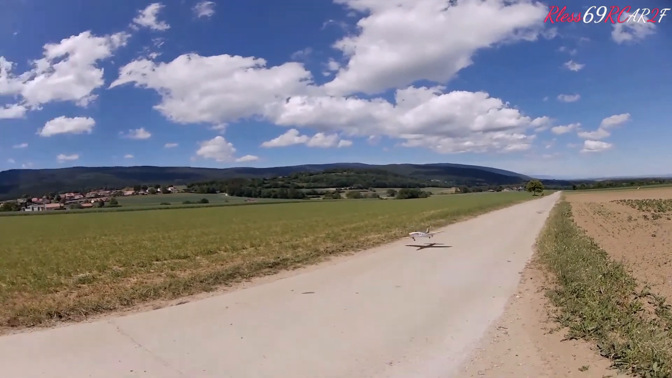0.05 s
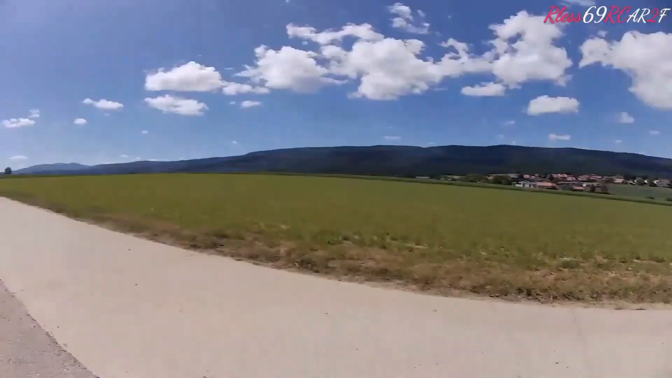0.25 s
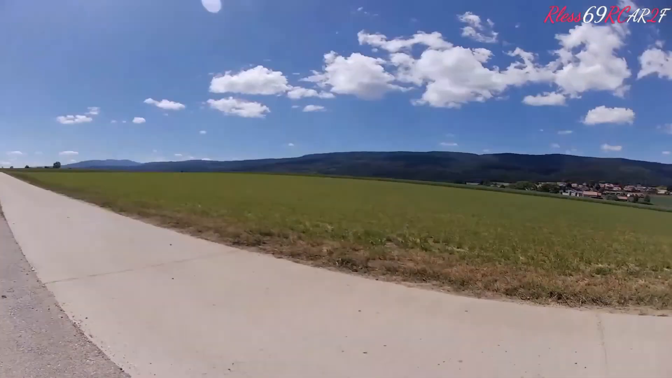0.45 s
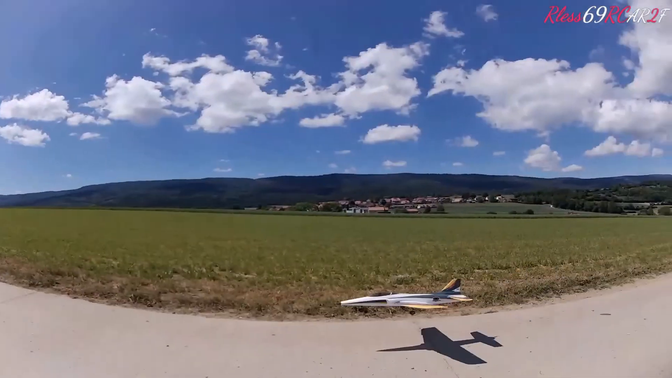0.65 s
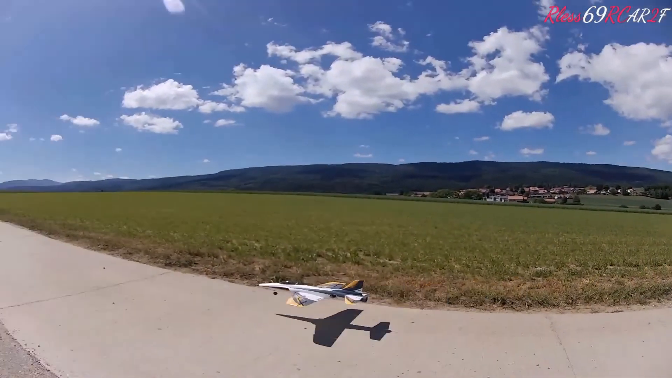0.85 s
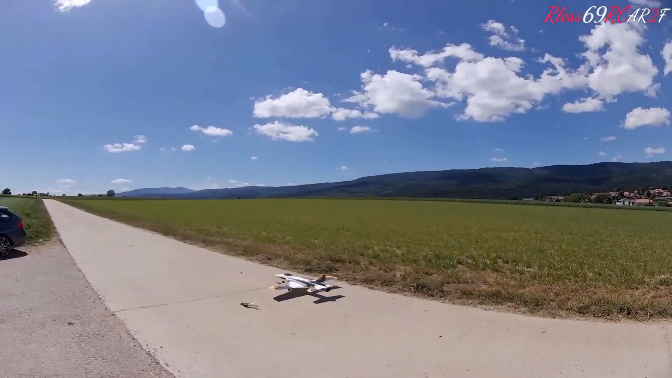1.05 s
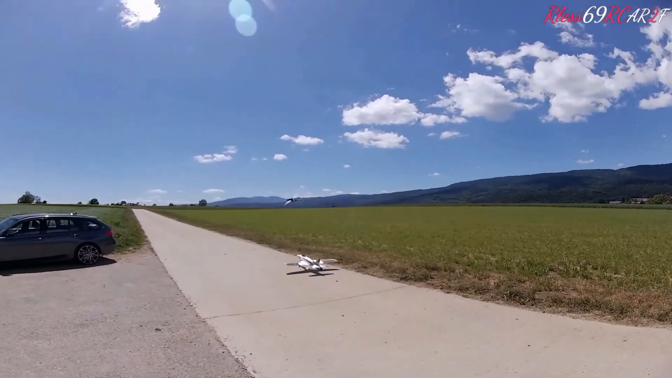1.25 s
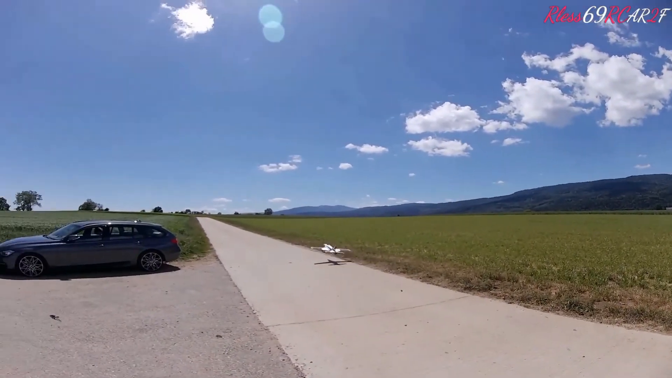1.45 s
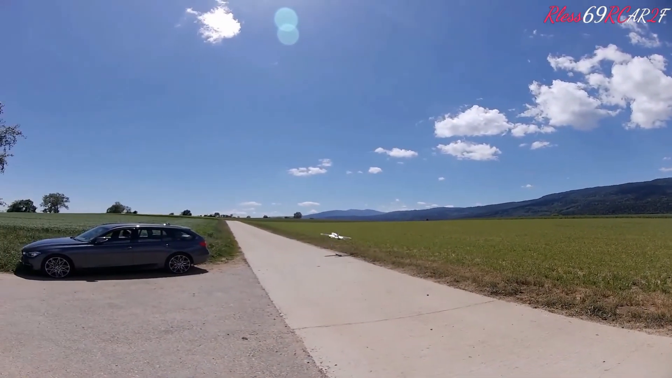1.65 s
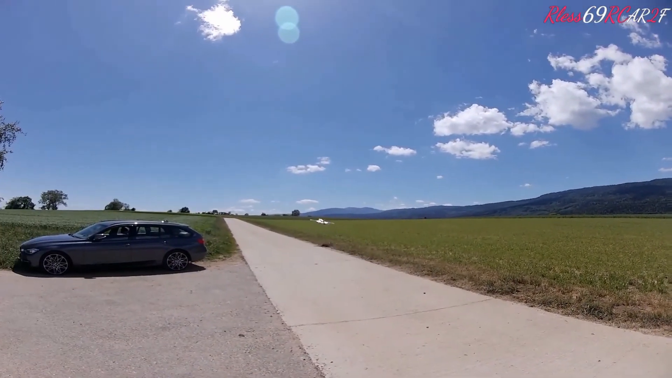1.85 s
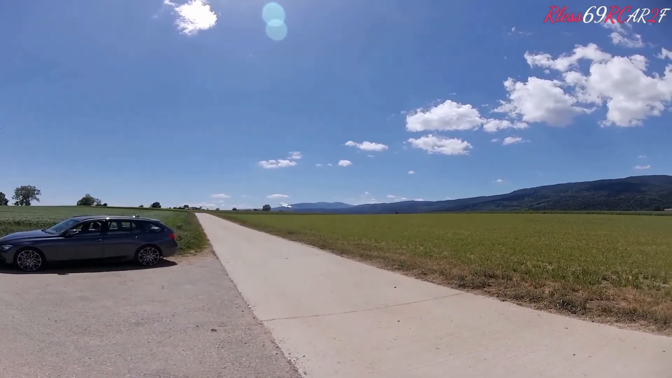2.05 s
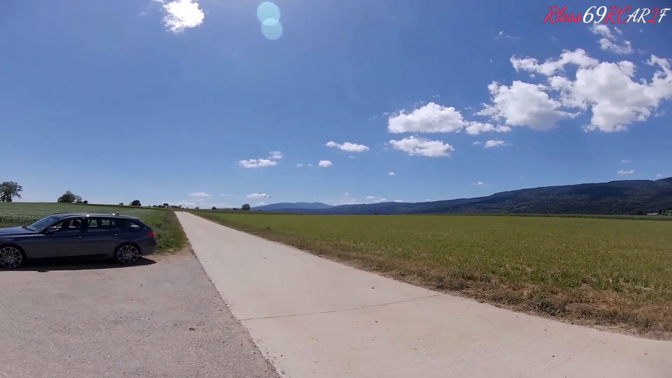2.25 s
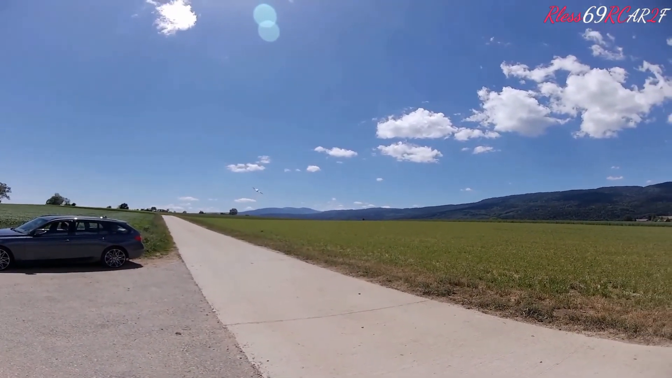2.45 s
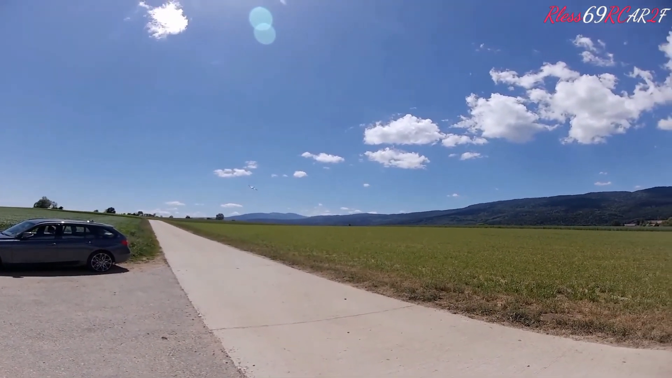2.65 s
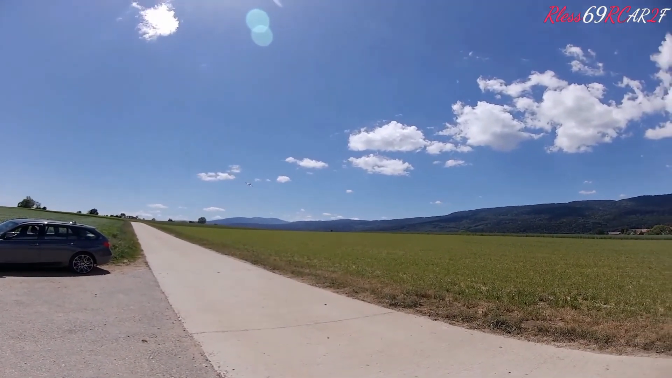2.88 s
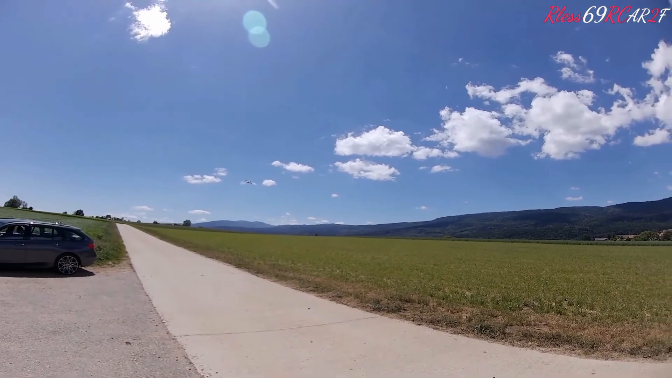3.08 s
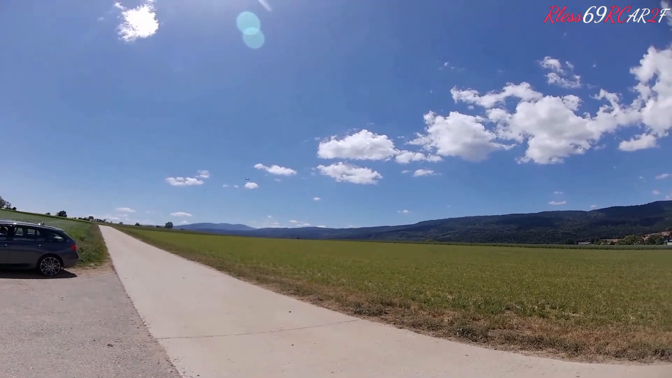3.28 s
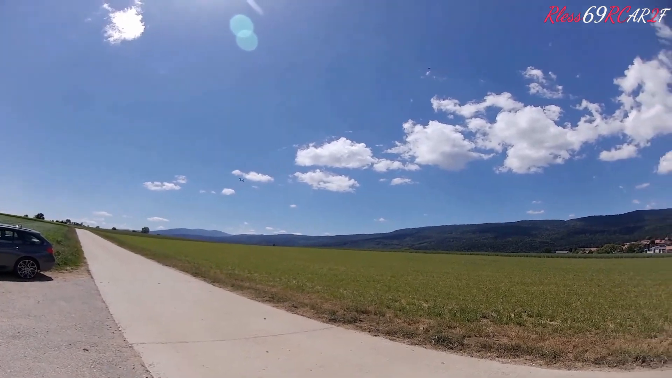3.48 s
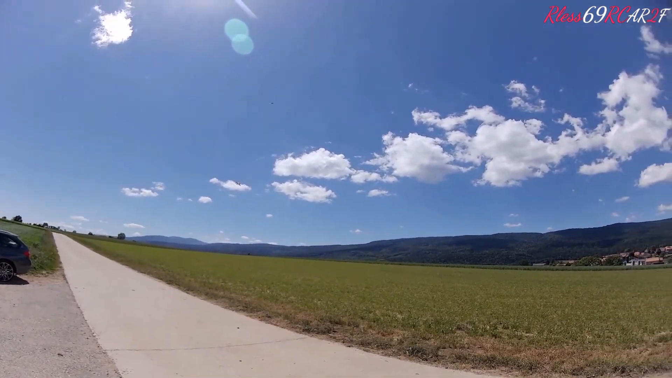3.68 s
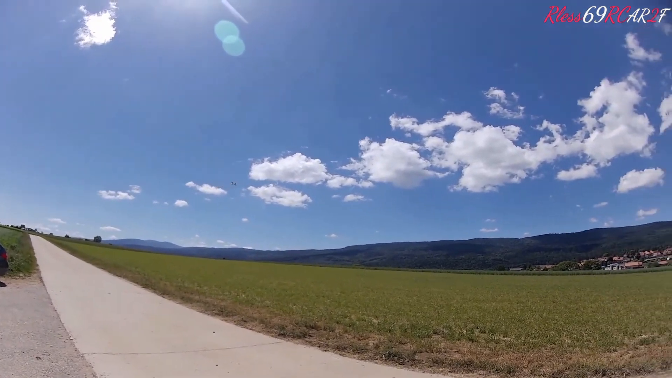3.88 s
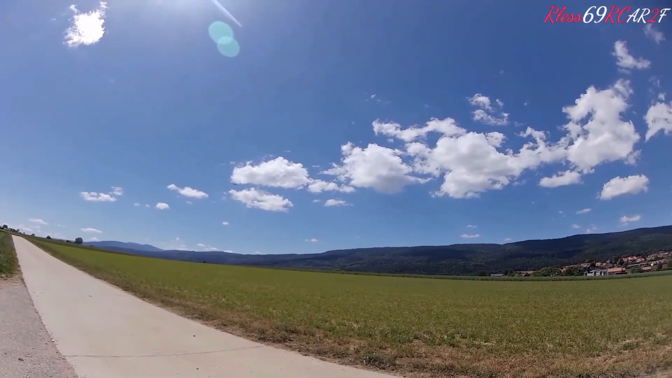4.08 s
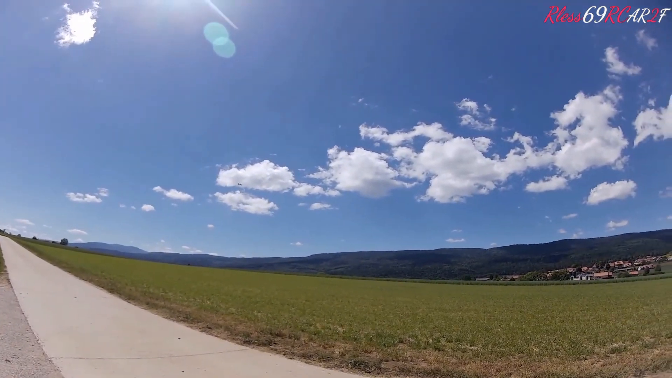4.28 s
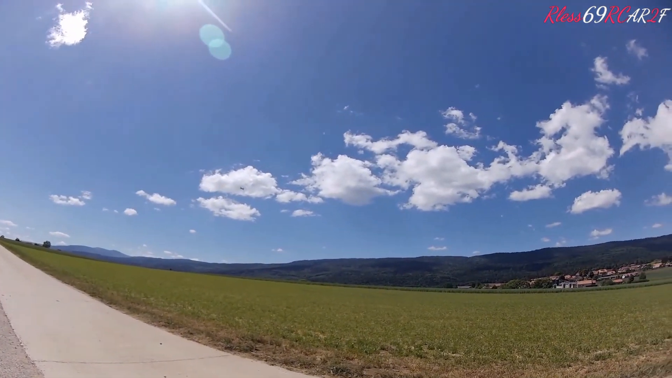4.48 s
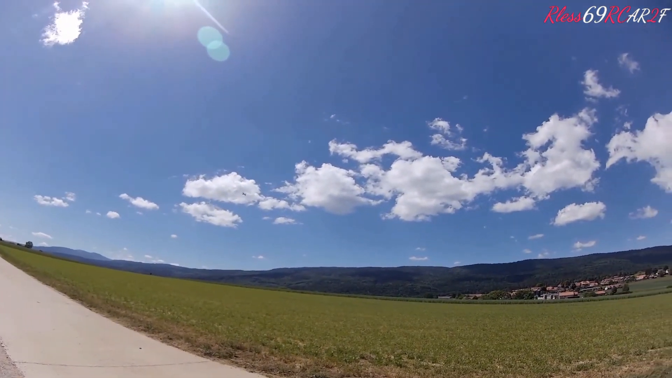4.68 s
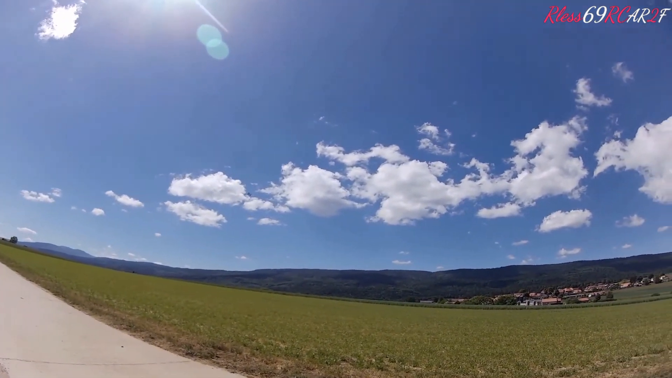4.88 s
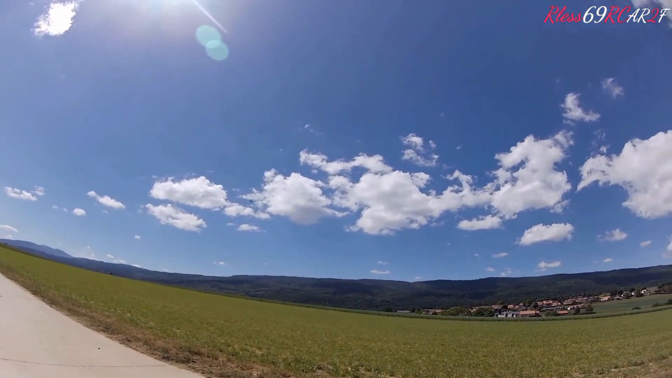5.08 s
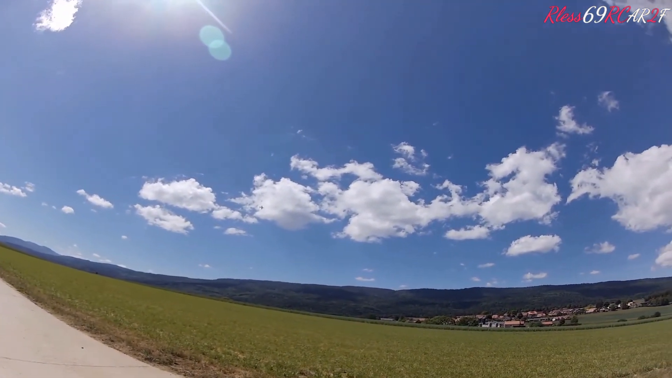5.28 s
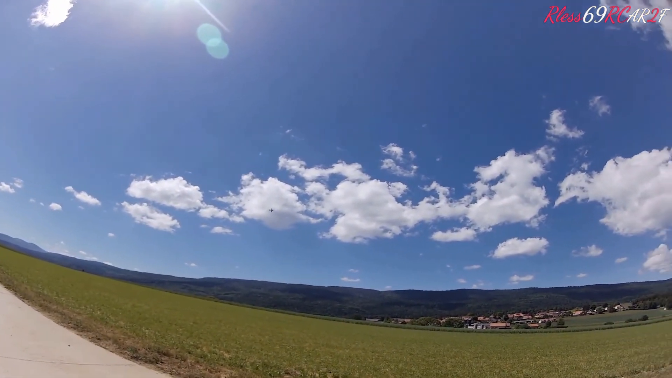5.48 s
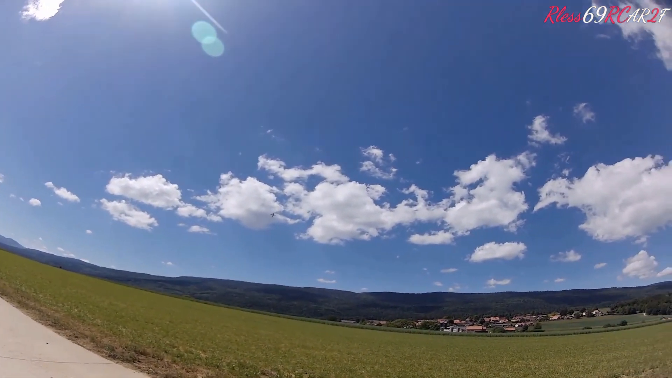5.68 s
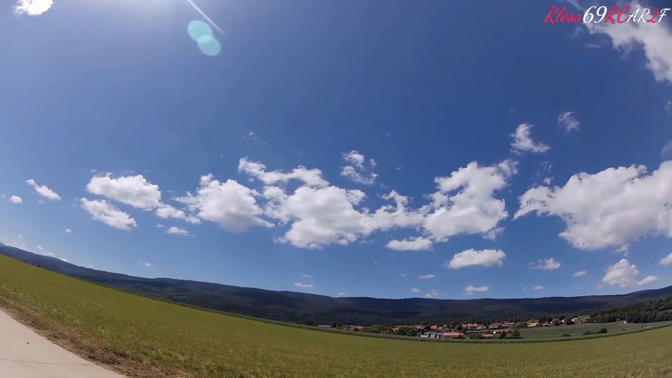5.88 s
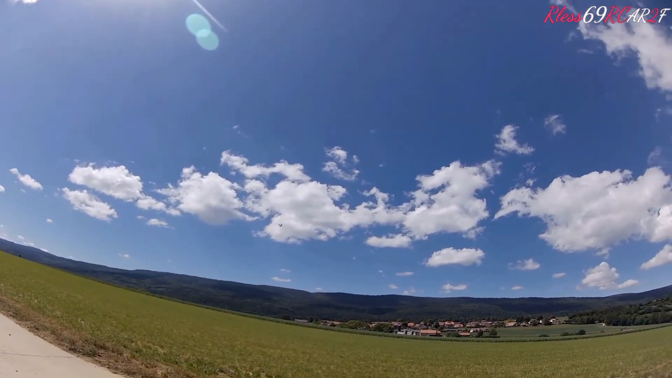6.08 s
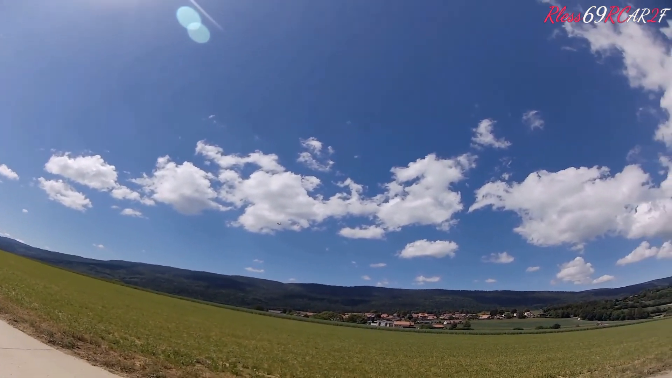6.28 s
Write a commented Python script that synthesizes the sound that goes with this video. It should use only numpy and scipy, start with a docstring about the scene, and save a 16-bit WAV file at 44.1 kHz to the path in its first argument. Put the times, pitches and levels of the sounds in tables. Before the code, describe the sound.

From 0 to 0.65 s the close stereo microphone picks up low wind buffets, grainy cloth rubbing, a sharp click at 0.2, a hard dull knock at 0.56 and another click at 0.63. From about 0.65 an electric model jet spools up steeply, fuzzy whine gliding to around 7 kHz by 1.1 s, with a higher octave, a low rotor hum and a strong broadband exhaust hiss as it passes close. After 1.4 s it recedes fast; the rush becomes hollow and its comb-like colour sweeps downward until about 3 s. A whine glints near 3 s, then the throttle eases from 3.2 to 4.4, pitch sagging and the rush thinning. It spools up again around 4.8 to 5, faint and twinkling, remaining distant to 6.3 s. Lumpy gusts rumble at 1.7, 3.7 and 4.3, with smaller puffs and soft knocks near 4.9, 5.75 and 6.1, over very quiet open-field noise.

```python
"""Model jet taking off past a body-worn camera

An electric ducted-fan jet spools up on a concrete strip, rolls past, lifts off and climbs away, easing
the throttle for a while. Its ten-blade fan whines as fuzzy tones locked to the shaft, over the exhaust,
which is shaped noise; the bounce off the ground sweeps a comb through it as the jet climbs. Gusts of low
noise buffet the camera, which rustles, clicks and knocks as it turns to follow, in a quiet open field.
"""
import sys
import numpy as np
from scipy import signal
from scipy.fft import rfft, irfft
from scipy.io import wavfile
from scipy.ndimage import uniform_filter1d

SR = 44100
rng = np.random.default_rng(int(sys.argv[2]) if len(sys.argv) > 2 else 0)


def file_out(sig):
    """Save sig as 16-bit WAV at sys.argv[1]."""
    # one column per channel
    cols = np.atleast_2d(sig).T
    # limit, then scale
    lim = np.clip(cols, -1, 1)
    pcm = np.round(lim * 32767).astype(np.int16)
    wavfile.write(sys.argv[1], SR, pcm)


N = 279577
TIME = np.arange(N) / SR
# the grid of short-time noise spectra: frame times down, frequencies across
FRAME_S = np.arange(N // 256 + 5)[:, None] * 256 / SR
BIN_HZ = np.fft.rfftfreq(1024, 1 / SR)

# Fan speed as heard from the camera. Each row: time in seconds, shaft turns a second.
SHAFT_SPEED = [(0.6, 230.8), (0.72, 354.9), (0.9, 603.8), (0.98, 663.6), (1.08, 704.9), (1.52, 689.0),
               (3.03, 671.5), (3.2, 641), (3.35, 638.5), (3.48, 574.7), (3.62, 546.2), (3.86, 524.2),
               (4.4, 527.1), (4.48, 562.2), (4.72, 563.9), (4.9, 660.6), (5.0, 680.3), (5.8, 687.8),
               (6.34, 701.6)]
# Relative spectrum of the exhaust rush. Each row: frequency in Hz, density in dB per Hz.
RUSH_SPECTRUM = [(60, -33), (350, -12), (700, -7.5), (1200, 4), (1850, -12), (2650, -10.5), (2950, -14.5),
                 (4100, 1.5), (5000, -10.5), (6600, -10), (8900, -16), (9700, -13), (11200, -14),
                 (14500, -19.5)]
# Phase between the two microphone ports. Each row: frequency in Hz, radians by which left leads.
PORT_LEAD = [(100, 0), (3000, 0.14), (8000, -0.45), (14000, -0.75)]


def amp(db):
    """Amplitude factor for a level in dB."""
    return 10 ** (np.asarray(db) / 20)


def evened(x):
    """The signal scaled to rms 1."""
    return x / np.sqrt(np.mean(x ** 2) + 1e-20)


def read(points, hz):
    """A spectrum, joined on a log-frequency axis."""
    f, value = np.transpose(points)
    return np.interp(np.log(hz + 1), np.log(f + 1), value)


def follow(rows, t):
    """The columns of a control table at times t."""
    s, *columns = np.transpose(rows)
    return [np.interp(t, s, c) for c in columns]


def add(mix, s, sound):
    """Lay a sound into the mix from time s, cut at the end."""
    part = mix[max(round(s * SR), 0):][:len(sound)]
    part += sound[:len(part)]


def wander(rate_hz):
    """Smooth chance of rms 1, with changes up to about rate_hz."""
    hz = np.fft.rfftfreq(N, 1 / SR)
    spectrum = rfft(rng.standard_normal(N)) / (1 + (hz / rate_hz) ** 2)
    return evened(irfft(spectrum, N))


def band_rms(gain, lo_hz, hi_hz):
    """The rms that noise of this spectrum has within one band."""
    inside = (BIN_HZ > lo_hz) & (BIN_HZ < hi_hz)
    return np.sqrt(np.mean(gain ** 2 * inside, -1, keepdims=True))


def noise(gain, patchy_db):
    """Noise at both ports with the given short-time spectrum, broken into drifting patches."""
    # Likeness of the two microphone ports. Each row: frequency in Hz, likeness from 0 to 1.
    likeness = [(120, .9993), (300, .994), (1400, .98), (3000, .94), (7000, .86), (14000, .6)]
    a, b, c, d, patches = rng.standard_normal((5, len(FRAME_S), len(BIN_HZ)))
    patches = uniform_filter1d(patches, size=8, axis=0)
    patches = evened(uniform_filter1d(patches, size=12, axis=1))
    same = np.clip(read(likeness, BIN_HZ), 0, 1)
    mid = np.sqrt((1 + same) / 2) * (a + 1j * b)
    side = np.sqrt((1 - same) / 2) * (c + 1j * d)
    left = mid + side
    right = (mid - side) * np.exp(-1j * read(PORT_LEAD, BIN_HZ))
    frames = np.array([left, right]) * gain * amp(patchy_db * patches)
    sound = signal.istft(frames.swapaxes(1, 2), nperseg=1024, noverlap=768)[1]
    return sound[:, :N] * np.sqrt(3 / 1024)


def tone(hz, level_db, fuzz, fuzz_hz):
    """A partial at both ports; turbulence scatters a share of it into a narrow skirt."""
    turn = np.exp(2j * np.pi * np.cumsum(hz) / SR)
    scatter = (wander(fuzz_hz) + 1j * wander(fuzz_hz)) / np.sqrt(2)
    # dividing by the total keeps the level whatever the fuzz
    line = np.sqrt(2) * amp(level_db) * turn * (1 + fuzz * scatter) / np.sqrt(1 + fuzz ** 2)
    return np.array([line.real, (line * np.exp(-1j * read(PORT_LEAD, hz))).real])


def fan():
    """Blade whine, rotor hum, motor tone and weak shaft orders, all locked to one slightly unsteady shaft."""
    # Blade-passing whine, beamed unevenly from the duct as the jet turns.
    # Each row: time in seconds, level in dB before the trim and twinkle below.
    whine_rows = [(0.68, -62.0), (0.76, -52), (0.84, -60), (0.94, -35.5), (1.44, -62.5), (2.56, -62.5),
                  (2.98, -44), (3.46, -59), (4.34, -59.9), (4.82, -79), (4.96, -49), (5.06, -64.5),
                  (5.2, -44.5), (5.36, -59.5), (5.42, -45.5), (5.5, -63), (5.84, -73), (6.32, -66)]
    # Octave of the whine. Each row: time in seconds, level in dB before the trim and twinkle below.
    octave_rows = [(0.68, -66.5), (0.98, -39.5), (1.3, -32), (1.46, -47), (2.96, -73), (3.42, -64.5),
                   (4.2, -61), (5.3, -84), (6.32, -87)]
    # Hum of the slightly unbalanced rotor, once a turn.
    # Each row: time in seconds, level in dB before the ground bounce.
    hum_rows = [(.67, -57), (1.2, -45), (1.7, -63), (2.4, -78), (3.3, -61), (4.6, -70.5), (4.9, -57),
                (5.5, -66), (6.33, -70.5)]
    # Weak tones from unequal blades, coloured by the duct like the rush.
    # Each row: multiple of the shaft speed, dB against the rush before that colour.
    shaft_tones = [(2, -14), (4, -1.5), (6, -9)]
    # Echo of the whine off a parked car that the jet runs toward.
    # Each row: time in seconds, pitch ratio to the whine, level in dB.
    car_echo = [(1, 1.05, -100), (1.15, 1.048, -48), (1.75, 1.015, -52), (2.3, 1.002, -110)]
    blades = 10
    whine_trim_db, octave_trim_db = 2.5, -1
    twinkle_db, twinkle_hz = 3.5, 6.2  # moving air makes the tones twinkle

    shaft_hz = follow(SHAFT_SPEED, TIME)[0] * (1 + 0.00072 * wander(rate_hz=90))
    running = np.clip((TIME - .65) / .1, 0, 1)
    # close to the ground the intake swallows rough air; in the climb the whine turns purer
    fuzz = np.interp(TIME, [.8, .95, 2.6], [1.4, .6, .28])
    whine_db = follow(whine_rows, TIME)[0] + whine_trim_db + twinkle_db * wander(twinkle_hz)
    octave_db = follow(octave_rows, TIME)[0] + octave_trim_db + twinkle_db * wander(twinkle_hz)
    out = tone(blades * shaft_hz, whine_db, fuzz, fuzz_hz=42)
    out += tone(2 * blades * shaft_hz, octave_db, 2 * fuzz, fuzz_hz=60)
    hum = tone(shaft_hz, follow(hum_rows, TIME)[0], fuzz=.15, fuzz_hz=15)
    out += ground(TIME, shaft_hz) * hum

    # the motor's own thin tone carries only a short way
    motor_db = octave_db + np.interp(TIME, [2.3, 3.3], [-12, -30])
    out += tone(14 * shaft_hz, motor_db, fuzz=1.0, fuzz_hz=52.3)

    # the low orders stand out once the jet is high and the throttle opens again
    orders_db = rush(TIME)[0] + np.interp(TIME, [.8, 1.1, 4.7, 5.1], [-4, -1, -5, 4])
    for order, db in shaft_tones:
        hz = round(order) * shaft_hz
        order_db = orders_db + db + read(RUSH_SPECTRUM, hz) + twinkle_db * wander(twinkle_hz)
        out += tone(hz, order_db, 2 * fuzz, fuzz_hz=25.8)

    ratio, echo_db = follow(car_echo, TIME)
    out += tone(blades * shaft_hz * ratio, echo_db, fuzz=0.97, fuzz_hz=70)
    return out * running


def exhaust():
    """Jet noise meets its own bounce off the ground; the notches slide down as the jet gains height."""
    # The tailpipe's hollow band, heard best from straight behind.
    # Each row: time in seconds, lift in dB at its centre before the bands are levelled.
    pipe_rows = [(1.2, 2.5), (1.9, 9.5), (3.4, 9.5), (3.7, 0), (4.7, -4), (5.1, 8)]
    pipe_hz, pipe_width_hz = 2440, 780
    level_db, treble_db = rush(FRAME_S)
    gain = amp(read(RUSH_SPECTRUM, BIN_HZ)) * ground(FRAME_S, BIN_HZ)
    pipe_shape = np.exp(-((BIN_HZ - pipe_hz) / pipe_width_hz) ** 2)
    gain = gain * amp(follow(pipe_rows, FRAME_S)[0] * pipe_shape)
    gain = gain / band_rms(gain, 2200, 4700)
    # the share of hiss changes with the angle of the nozzle
    treble = amp(treble_db) / band_rms(gain, 7600, 10000)
    gain = gain * treble ** np.interp(BIN_HZ, [4500, 7500], [0, 1])
    # far air soaks up the top
    air_db = -1.4 * np.clip(FRAME_S - 1, 0, 2) * np.maximum(BIN_HZ / 9000 - 1, 0)
    flutter_db = .7 * wander(rate_hz=10)
    fade_in = np.clip((TIME - .55) / 0.3, 0, 1)
    return noise(gain * amp(level_db + air_db), patchy_db=1.5) * amp(flutter_db) * fade_in


def rush(t):
    """Level and treble share of the exhaust: it grows with shaft speed and fades with distance."""
    # The rush at full speed, as distance and the angle of the nozzle change.
    # Each row: time in seconds, level in dB (2.2-4.7 kHz), treble (7.6-10 kHz) against it in dB.
    rush_rows = [(.6, -38, -16), (1.12, -36, -3.5), (1.3, -36.5, -7), (1.55, -45, -6), (2.3, -50.5, -4.5),
                 (2.6, -55.5, -7.5), (3.3, -55, -6), (3.6, -61.5, 0), (5.3, -64.5, -3.5), (5.7, -70, -2.5),
                 (6.33, -67, -7.5)]
    full_speed_hz, db_per_octave = 740, 9  # gain for each doubling of the shaft speed
    level_db, treble_db = follow(rush_rows, t)
    speed_octaves = np.log2(follow(SHAFT_SPEED, t)[0] / full_speed_hz)
    return level_db + db_per_octave * speed_octaves, treble_db


def ground(t, hz):
    """Gain of the direct sound plus its later bounce off the ground, which combs the spectrum."""
    # Path of the bounce. Each row: time in seconds, lag behind the direct sound in ms.
    lag_rows = [(.6, .2), (1, .285), (1.4, .27), (1.6, .36), (2, .72), (2.5, 1.35), (3, 1.85), (4, 2.7),
                (5, 3.25), (6.3, 3.8)]
    # Strength of the bounce at low frequencies. Each row: time in seconds, strength from 0 to 1.
    bounce_rows = [(1.3, .9), (1.7, .5), (2.3, .62), (3.3, .66), (4, .3), (6.3, .15)]
    scatter_hz = 5000  # rough ground scatters the treble above this
    lag_s = follow(lag_rows, t)[0] / 1000
    strength = np.clip(follow(bounce_rows, t)[0], 0, 1)
    bounce = strength / (1 + (hz / scatter_hz) ** 3)
    return abs(1 + bounce * np.exp(-2j * np.pi * hz * lag_s))


def wind():
    """Lumpy eddies on the microphone rumble as low noise, with a few sharp buffets."""
    # Relative spectrum of the rumble before the eddies shift it.
    # Each row: frequency in Hz, density in dB per Hz.
    rumble_spectrum = [(15, -17), (30, -0.5), (70, 3), (145, 1), (280, -11), (500, -21.5), (950, -26),
                       (1400, -39.5), (6000, -53)]
    # The size of the eddies sets the pitch of the rumble. Each row: time in seconds, factor on that pitch.
    eddy_rows = [(.3, 1.38), (.5, 1.08), (.85, 1.24), (1.7, 0.87), (2.9, 1.01), (3.8, 1.054), (4.8, 1.21),
                 (5.9, 1.06)]
    # Sharp buffets of air. Each row: time of the peak in seconds, length in seconds, peak level in dB.
    buffet_rows = [(0.019, 0.045, -41), (0.306, 0.069, -39.5), (1.171, 0.056, -31.5), (3.397, 0.03, -47),
                   (3.86, 0.12, -46), (3.887, 0.014, -41), (4.391, 0.025, -50), (5.765, 0.014, -43),
                   (5.797, 0.026, -38)]
    # Relative spectrum of a buffet. Each row: frequency in Hz, density in dB per Hz.
    buffet_spectrum = [(60, -56), (250, -3.5), (800, 2), (1300, -11), (1900, -24), (5000, -39)]
    lumps_db, lumps_hz = 1.83, 19  # the wind is uneven within a gust

    pitch = np.maximum(follow(eddy_rows, FRAME_S)[0], .5)
    gain = amp(read(rumble_spectrum, BIN_HZ / pitch))
    gain = gain / band_rms(gain, 25, 300)
    rumble = noise(gain, patchy_db=1) * gusts() * amp(lumps_db * wander(lumps_hz))
    burst = np.zeros(N)
    for s, length, db in buffet_rows:
        burst += amp(db) * np.exp(-(2 * (TIME - s) / length) ** 2)
    puff = evened(noise(amp(read(buffet_spectrum, BIN_HZ)), patchy_db=2))
    return rumble + burst * puff


def gusts():
    """Strength of the wind: each gust swells, holds and dies away over nearly calm air."""
    # Gusts at the microphone, short ones riding on long ones.
    # Each row: start of the hold in seconds, its length in seconds, level in dB.
    gust_rows = [(0.0, 0.058, -44.5), (0.241, 0.077, -29), (0.411, 0.093, -39.5), (0.653, 0.68, -43),
                 (0.777, 0.3, -36), (1.414, 1.81, -47.0), (1.666, 0.48, -39), (1.92, 0.051, -36),
                 (3.407, 0.087, -38.5), (3.7, 0.28, -35), (4.057, 0.76, -45.5), (4.24, 0.31, -35.5),
                 (5.82, 0.16, -40.5), (6.07, 0.3, -59)]
    rise_db_per_s, fall_db_per_s, calm_db = 268, 197, -65.5
    power = amp(calm_db) ** 2
    for start, length, db in gust_rows:
        before = np.maximum(start - TIME, 0)
        after = np.maximum(TIME - start - length, 0)
        power = power + amp(db - rise_db_per_s * before - fall_db_per_s * after) ** 2
    return np.sqrt(power)


def handling():
    """Grainy rubbing, clicks and knocks of the turning camera."""
    # Cloth and mount rubbing as the camera turns. Each row: time in seconds, level in dB before the crackle.
    rustle_rows = [(.08, -52.5), (.18, -49.5), (.24, -41), (.27, -48.5), (.39, -41), (.43, -45.5),
                   (.5, -52.5), (.54, -42.5), (.68, -44), (.9, -65)]
    # Relative spectrum of the rubbing. Each row: frequency in Hz, density in dB per Hz.
    rustle_spectrum = [(300, 13), (1200, 8.5), (2000, -13), (3000, -2.5), (4000, 2), (5000, -5.5),
                       (7000, -0.5), (9000, -6), (13000, -1)]
    # Sharp clicks of the camera mount. Each row: time in seconds, peak in dB.
    click_rows = [(.179, -34), (.2142, -15.5), (.238, -29), (.399, -28), (.6323, -16.5)]
    # Ringing of a click. Each row: frequency in Hz, relative level in dB, 60 dB decay time in seconds.
    click_modes = [(3900, -10, 0.012), (5570, 4, 0.003), (7600, 0, 0.0034), (10000, -11.5, 0.0039),
                   (12340, -5, 0.0034)]
    # Dull knocks on the camera body; softer blows are duller.
    # Each row: time in seconds, peak in dB, dulling in dB per octave.
    knock_rows = [(.2505, -21, 13), (.417, -29, 15), (.5571, -13.5, 6), (.6395, -29, 12), (4.9, -36, 16),
                  (5.716, -39, 16), (6.131, -40, 16)]
    # Ringing of a knock before dulling.
    # Each row: frequency in Hz, relative level in dB, 60 dB decay time in seconds.
    knock_modes = [(450, -13, .008), (820, -10, .006), (1450, 0, .012)]

    rub = evened(noise(amp(read(rustle_spectrum, BIN_HZ)), patchy_db=3.5))
    crackle_db = 2.8 * wander(rate_hz=220)
    rub = rub * amp(follow(rustle_rows, TIME)[0] + crackle_db)
    undulled_clicks = [(s, db, 0) for s, db in click_rows]
    clicks = taps(undulled_clicks, click_modes, rise_s=.0004)
    knocks = taps(knock_rows, knock_modes, rise_s=.0003)
    return rub + clicks + knocks


def taps(rows, modes, rise_s):
    """Each blow rings the same few short-lived modes of the plastic; a soft one favours the low modes."""
    t = np.arange(SR // 25) / SR
    out = np.zeros(N)
    for s, peak_db, dull_db in rows:
        ring = np.zeros(len(t))
        for hz, db, t60 in modes:
            decay = amp(db - dull_db * np.log2(hz) - 60 * t / t60)
            ring += decay * np.sin(2 * np.pi * (hz * t + rng.random()))
        ring = ring * (1 - np.exp(-t / rise_s))
        add(out, s, amp(peak_db) * ring / abs(ring).max())
    return out


def field():
    """Steady, shaped noise of the open field around the strip."""
    # Relative spectrum of the background. Each row: frequency in Hz, density in dB per Hz.
    field_spectrum = [(30, -15), (450, -3), (830, 0.5), (1300, -2), (1900, -6.5), (4000, -4), (9000, -35),
                      (15000, -16)]
    level_db = -66.5
    return amp(level_db) * evened(noise(amp(read(field_spectrum, BIN_HZ)), patchy_db=0.2))


def scene():
    """The jet, the wind, the camera and the field, summed at the two ports."""
    return fan() + exhaust() + wind() + handling() + field()


def record(dry):
    """The recorder's band limit: a steep low-pass filter."""
    edge_hz = 14700
    low_pass = signal.firwin(511, edge_hz, window=("kaiser", 9), fs=SR)
    return signal.oaconvolve(dry, low_pass[None], "same")


dry = scene()
out = record(dry)
file_out(out)
```